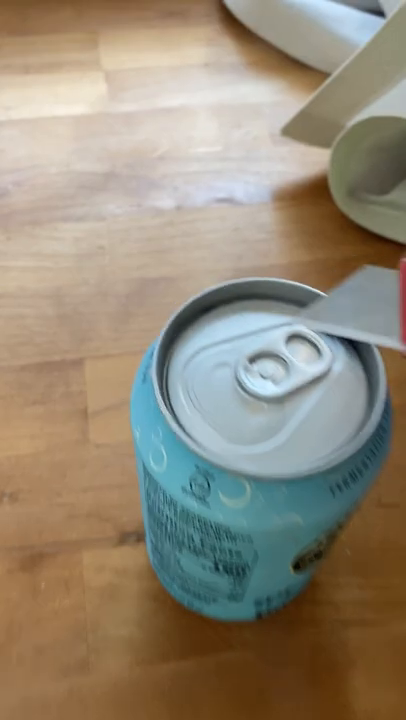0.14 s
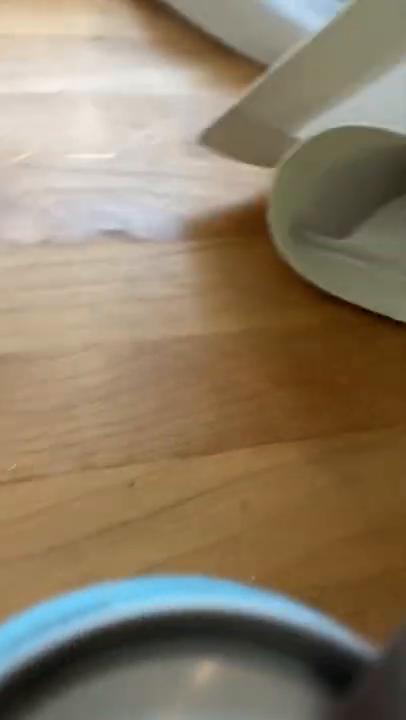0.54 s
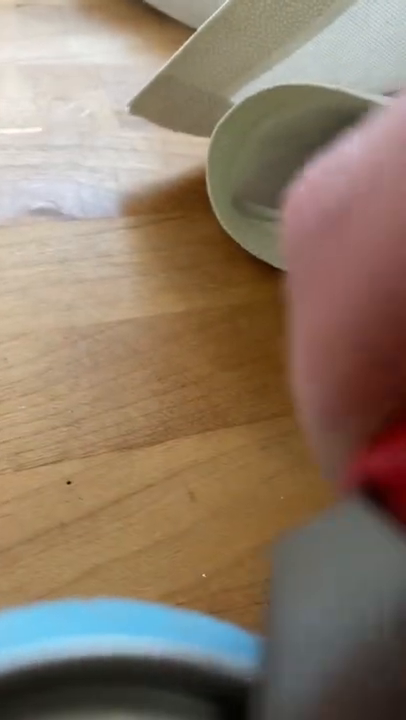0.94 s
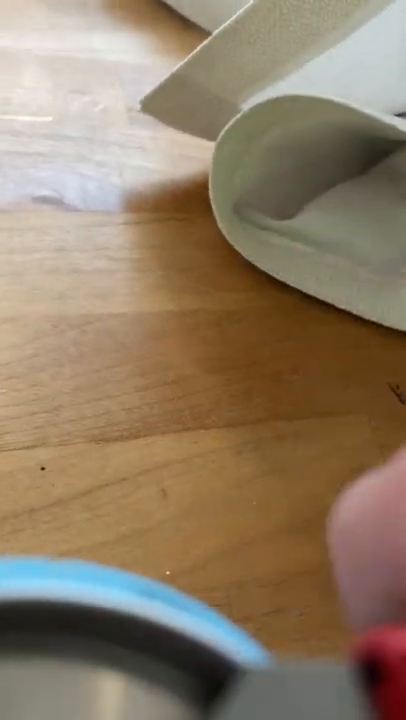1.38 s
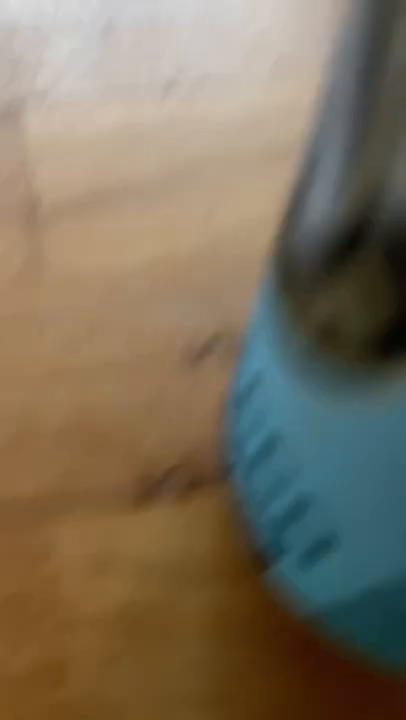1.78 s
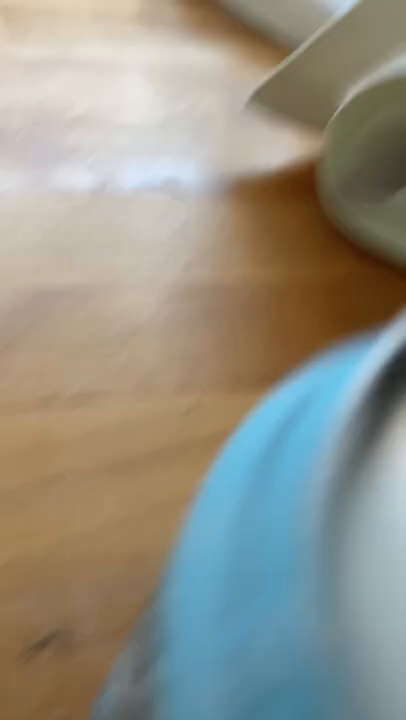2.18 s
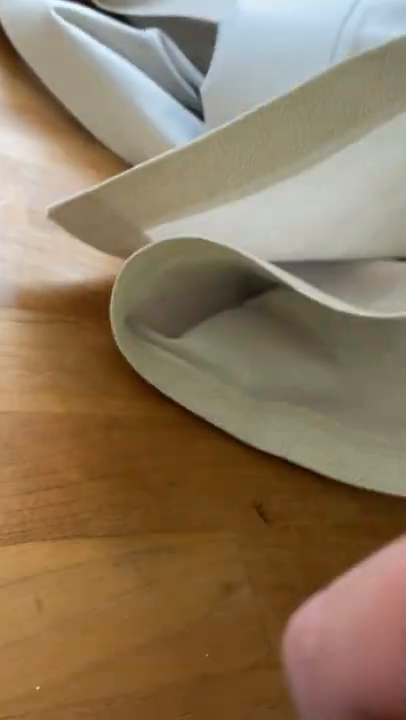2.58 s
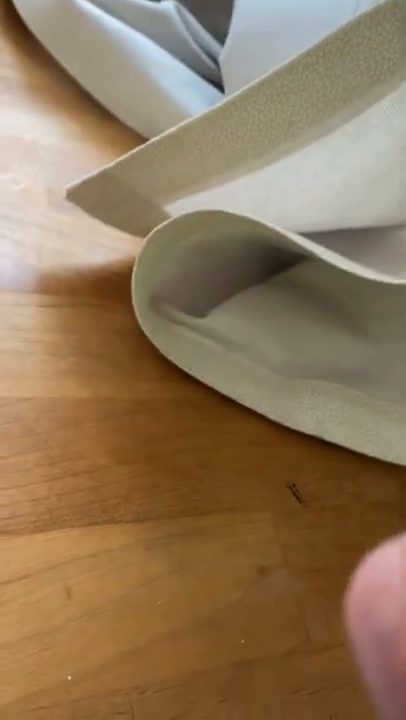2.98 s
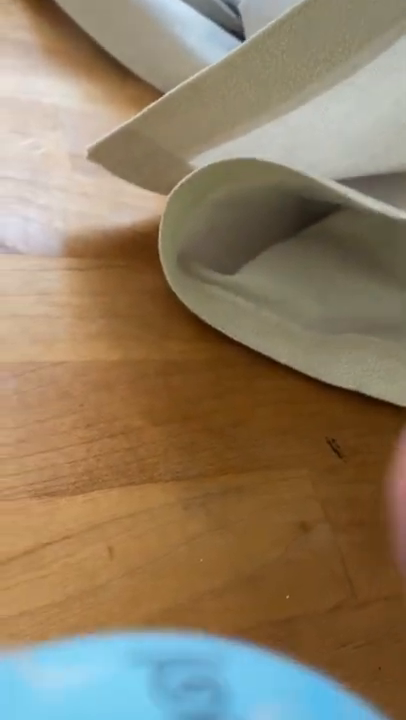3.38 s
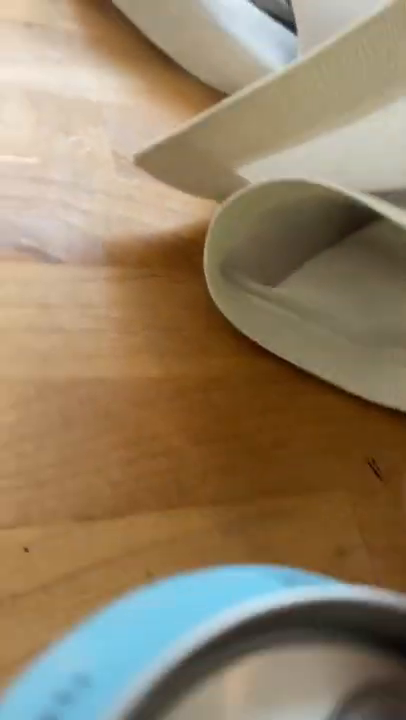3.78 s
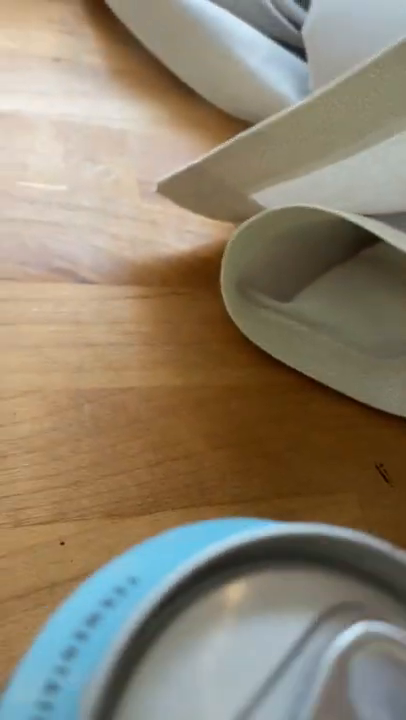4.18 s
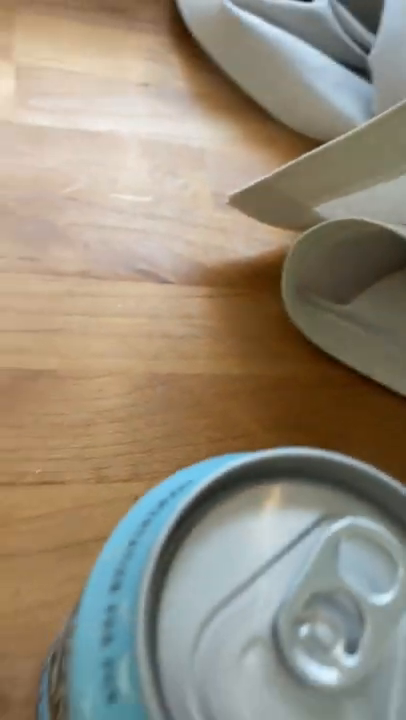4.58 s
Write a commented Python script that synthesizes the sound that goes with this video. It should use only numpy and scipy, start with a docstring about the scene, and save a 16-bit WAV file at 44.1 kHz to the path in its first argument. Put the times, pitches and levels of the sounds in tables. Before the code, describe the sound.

Close phone sound in a small, quiet room with faint room tone and soft hand rumble. Tiny liquid blips come around 0.1-0.2 s, then a loud, bright steel click on the can rim at 0.3. Two ringing lid taps fall at 0.71-0.74, with light scraping and a quick run of ticks to 0.93. A firm scrape swells at 1.05-1.1, and a strong lid click with a soft table bump lands at 1.25. From 1.5 to 2.7 there are only small ticks, faint rubbing and light taps. Thin metal snaps at 2.83 and harder at 3.03, with table thumps and a hiss of about a tenth of a second; another crack follows at 3.1. A rough grinding cut builds from 3.26, squeaks briefly, and ends in a crack and thud at 3.5. A bump comes at 3.78, a dull tab clink at 4.1, then clustered rattling knocks on the phone at 4.5-4.75.

```python
"""In a small room, close to a phone, a knife works at a full aluminium can on a wooden table.
The blade clicks and scrapes on lid and tab: ringing notes for each blow, filtered random slips for each scrape.
The metal gives with snaps (short noise bursts) and a brief hiss of gas (coloured noise), and the blade
grinds through the opening. The can shifts and bumps on the table (short fading notes and rumbling noise),
and last, fingers knock on the phone (fading notes and rattling noise)."""
import sys
import numpy as np
from scipy import signal
from scipy.fft import rfft, irfft, next_fast_len
from scipy.io import wavfile
from scipy.ndimage import map_coordinates

SR = 44100
rng = np.random.default_rng(int(sys.argv[2]) if len(sys.argv) > 2 else 0)


def unload_wav(signal):
    """Save mono or channel-first audio to the path in sys.argv[1] as 16-bit WAV at rate SR, clipped to [-1, 1]."""
    wavfile.write(
        sys.argv[1],
        SR,
        np.round(np.clip(np.atleast_2d(signal).T, -1, 1) * 32767).astype(np.int16),
    )


N = 209122  # length of the scene in samples
T = np.arange(int(SR * 3 / 4)) / SR  # clock of one short sound, in seconds

# In these tables t60 is the time to fall 60 dB, before any ring length factor.
# notes of the lid: f/Hz, level struck near the rim/dB, level struck near the centre/dB, t60/s
LID_MODES = [(1830, -16, -9, 0.07), (1995, -13.5, 3.5, 0.1), (2120, -2.5, -4.5, 0.046), (2296, -1, -8, .04),
             (2435, -3.5, -8.5, 0.066), (3005, -12, -21.5, 0.082), (3320, -21, -10.5, 0.14),
             (4040, -9, -18.5, 0.083), (4110, -9.5, -4, 0.034), (4430, -6.5, -19, 0.011),
             (5480, -2, -18.5, 0.052), (5720, -12.5, 3, 0.06), (6900, -5, -11, 0.0093),
             (6820, 5.5, -23, 0.037), (6850, -7.5, -27.5, 0.0092)]
# faint hum of the whole can after a blow: f/Hz, level/dB, t60/s
SHELL_MODES = [(272.6, -45, 0.98), (412, -48, 0.33), (1280, -55, 0.8), (1530, -48.5, 0.74)]


def amp(db):
    """Turn decibels into a gain."""
    return 10 ** (np.asarray(db) / 20)


def unit(x):
    """Scale to an rms of 1."""
    return x / np.sqrt(np.mean(x ** 2) + 1e-20)


def along(points, hz):
    """Read a curve of (f/Hz, value) points, joined by straight lines on a log frequency axis."""
    f, value = np.transpose(points)
    return np.interp(np.log(hz + 1), np.log(f), value)


def fade(t60):
    """Exponential decay that falls 60 dB in t60 seconds."""
    return amp(-60 * T / max(t60, .001))


def soft_start(rise_s):
    """A blow swells smoothly from zero, with time constant rise_s."""
    return 1 - np.exp(-T / rise_s)


def wobble(rate):
    """A smooth curve through random points, rate of them a second."""
    points = rng.standard_normal(int(N * rate / SR) + 4)
    return map_coordinates(points, [np.arange(N) * rate / SR])


def filtered(x, response):
    """Change each frequency of x by a gain, which may be complex to shift it in time."""
    n = x.shape[-1]
    padded = next_fast_len(n + SR // 4)
    hz = np.fft.rfftfreq(padded, 1 / SR)
    return irfft(rfft(x, padded) * response(hz), padded)[..., :n]


def noise(spectrum, size):
    """Noise of rms 1, coloured by (f/Hz, level/dB) points."""
    return unit(filtered(rng.standard_normal(size), lambda hz: amp(along(spectrum, hz))))


def resonate(x, body):
    """Pass x through side-by-side resonances: (f/Hz, width/Hz, level/dB)."""
    def response(f):
        total = 0
        for k, (centre, width, db) in enumerate(body):
            band = 1j * f * width / (centre * centre - f * f + 1j * f * width)
            total = total + (-1) ** k * amp(db) * band  # neighbours have opposite signs
        return total
    return filtered(x, response)


def add(track, s, sound):
    """Mix a sound into the track from second s."""
    part = track[round(s * SR):][:len(sound)]
    part += sound[:len(part)]


def stroke(start, attack, hold, release, growth_db=0):
    """Gain over time: a rise, a hold that grows by growth_db a second, and a 60 dB fall in release seconds."""
    t = np.arange(N) / SR - start
    rise = np.clip(t / max(attack, .001), 0, 1) ** 2
    growth = growth_db * np.clip(t - attack, 0, hold)
    fall = 60 * np.maximum(t - attack - hold, 0) / max(release, .001)
    return rise * amp(growth - fall)


def cutting(growth_db):
    """The effort of the cut builds slowly and stops short; blade and bracing hand share it."""
    start_s, attack_s, hold_s, release_s = 3.2597, .15, 0.084, 0.067
    return stroke(start_s, attack_s, hold_s, release_s, growth_db)


def air():
    """Room tone: steady coloured noise, separate at each port."""
    # colour of the room tone: f/Hz, level/dB
    air_colour = [(15, -57.5), (25, -35), (92, -10.5), (199, -21.5), (248, -3), (331, -23), (635, -10),
                  (699, -36), (2120, -30.5), (2570, -38), (8000, -34.5), (10400, -76.5), (17600, -120)]
    return amp(-67.5) * np.array([noise(air_colour, N), noise(air_colour, N)])


def handling():
    """The holding hand rumbles, its skin rustles as it shifts and braces, and the cider laps in short notes."""
    # the hand shifts its grip: t/s, hold/s, level/dB
    grip_shifts = [(0.428, 0.063, -55.5), (0.715, .24, -54), (1.145, 0.15, -47), (1.862, 0.13, -53),
                   (3.769, 0.023, -41.5), (4.007, 0.061, -47.5), (4.494, 0.29, -46.5)]
    # colour of the holding hand's rumble: f/Hz, level/dB
    grip_colour = [(25, -17.5), (60, 1.5), (150, 0), (290, -2), (420, -6), (600, -11.5), (800, -14.5),
                   (1400, -24), (3000, -40.5)]
    # colour of skin sliding on the can: f/Hz, level/dB
    skin_colour = [(25, -36), (70, -10), (160, 0), (330, -2), (600, -11.5), (1400, -22), (3000, -38.5)]
    # cider laps inside the can: t/s, level/dB
    cider_laps = [(0.093, -43.5), (0.194, -34.5), (0.205, -31.5), (0.228, -34.5), (1.68, -38.5),
                  (4.318, -42)]
    attack_s, release_s, hold_until_s = 0.012, 0.36, 2.874
    holding = amp(-57) * stroke(-attack_s, attack_s, hold_until_s, release_s)
    shifts = sum(amp(db) * stroke(s, attack_s, hold, release_s) for s, hold, db in grip_shifts)
    bracing = amp(-37) * cutting(growth_db=80)  # ever harder against the cut
    rumble = holding * noise(grip_colour, N) * amp(-2 + 5.1 * wobble(16))
    rustle = (shifts + bracing) * noise(skin_colour, N) * amp(-2.5 + 2.5 * wobble(25))
    out = rumble + rustle
    lap_hz, lap_scatter = 700, .05  # middle pitch, and its share of scatter from lap to lap
    for s, db in cider_laps:
        hz = lap_hz * np.exp(lap_scatter * rng.standard_normal())
        lap = np.sin(2 * np.pi * hz * T) * fade(0.0082) * soft_start(0.0017)
        add(out, s, amp(db + 6) * lap)
    return out


def room(x):
    """Many small reflections make a noise-like tail, different at each port, whose top treble dies fastest."""
    # how long the room echoes: f/Hz, t60/s
    room_decay = [(100, 0.87), (400, 0.3), (1500, 0.55), (5000, 0.16), (14000, 0.073)]
    hz, t, z = signal.stft(rng.standard_normal((2, SR // 2)), SR, nperseg=256)
    decay = amp(-60 * t / along(room_decay, hz)[:, None])
    tail = signal.istft(z * decay, SR, nperseg=256)[1]
    delayed = np.pad(x, (SR // 200, 0))  # the tail starts 5 ms late
    return signal.fftconvolve(delayed[None], tail / np.linalg.norm(tail[0]), axes=1)[:, :N]


def diffuse(x, wet_db, t60):
    """Countless close modes smear and colour a sound: a short noise tail stands in for them."""
    tail = rng.standard_normal(len(T)) * fade(t60) * soft_start(0.0047)
    return x + amp(wet_db) * signal.fftconvolve(x, tail / np.linalg.norm(tail))[:N]


def ring(modes, length):
    """Fading sines of (f/Hz, level/dB, t60/s) modes; length stretches every t60."""
    waver_ms = .06  # the blade keeps moving on the metal, so a ring drifts by about this much in a second
    t = T + waver_ms / 1000 * np.cumsum(rng.standard_normal(len(T))) / np.sqrt(SR)
    out = 0
    for hz, db, t60 in modes:
        phase = rng.random()
        out = out + amp(db) * np.sin(2 * np.pi * (hz * t + phase)) * fade(t60 * length)
    return out


def strike(modes, tilt, length, crack_db, crack_t60):
    """One contact: fading modes, the shell's hum and a noise burst for dense, fast-dying overtones."""
    # colour of the noise burst: f/Hz, level/dB
    crack_colour = [(100, -39.5), (800, -23.5), (1600, 0.5), (2500, -2), (6500, 2.5), (9000, -5),
                    (12000, -8.5), (16000, -16.5)]
    hz, db, t60 = np.transpose(modes)
    db = db + tilt * np.log2(hz / 3000) + rng.normal(0, 1, len(hz))  # tilt in dB per octave
    tone = ring(zip(hz, db, t60), length) / np.linalg.norm(amp(db))
    crack = amp(crack_db + tilt) * noise(crack_colour, len(T)) * fade(crack_t60 * length)
    return (tone + ring(SHELL_MODES, 0.82) + crack) * soft_start(0.00055)


def rubbing():
    """How hard the blade rubs: light strokes, a resting contact, and its flat side along with the cut."""
    # light strokes of the blade on the can: t/s, hold/s, level/dB
    light_rubs = [(0.14, .12, -66.5), (0.48, 0.037, -56), (0.77, 0.23, -46.5), (1.135, .08, -43),
                  (1.57, 0.0057, -62), (1.71, 0.066, -69.5), (1.91, .08, -63.5), (2.14, .025, -62.5),
                  (2.315, 0.017, -63), (2.62, 0.22, -63), (3.655, 0.0085, -50), (4.61, .1, -59)]
    resting = (1.0, 1.442, -66)  # same columns: the edge stays against the can
    attack_s, release_s = 0.022, 0.23
    rows = light_rubs + [resting]
    strokes = sum(amp(db) * stroke(s, attack_s, hold, release_s) for s, hold, db in rows)
    return strokes + amp(-49.5) * cutting(0)


def ticks():
    """Catches of the edge ring the lid briefly; lesser ones come by chance, scaled by the rubbing."""
    # the edge catches and lets go: t/s, level/dB
    edge_ticks = [(0.0954, -49.5), (0.821, -41), (0.87, -38), (0.902, -30), (0.9173, -25.5), (0.9279, -26),
                  (1.6018, -34), (2.0501, -46.5), (2.1512, -35), (3.6967, -34)]
    modes = [(hz, (rim + centre) / 2, t60) for hz, rim, centre, t60 in LID_MODES]

    def tick():
        return strike(modes, tilt=0.39, length=0.13, crack_db=-1.5, crack_t60=0.06)

    out = np.zeros(N)
    for s, db in edge_ticks:
        add(out, s, amp(db + 0.5) * tick())
    catches_per_s, catch_db, scatter_db = 22, 4.5, 3.5  # level is over the rubbing
    moments = rng.random(N) < catches_per_s / SR
    catches = moments * rubbing() * amp(catch_db + scatter_db * rng.standard_normal(N))
    return out + signal.fftconvolve(catches, tick())[:N]


def friction(body, slips):
    """Tiny random slips, slips a second, ring the can; each resonance swells and fades by itself."""
    grains = (rng.random(N) < slips / SR) * rng.standard_normal(N)
    drive = (unit(grains) + amp(-6) * rng.standard_normal(N)) * amp(1.8 * wobble(170))
    bands = 0
    for k, mode in enumerate(body):
        bands = bands + (-1) ** k * resonate(drive, [mode]) * amp(2.5 * wobble(14))
    return unit(diffuse(bands, wet_db=-5, t60=.05))


def scrapes():
    """The edge rubs, pries and finally grinds: slip noise shaped by the strength of each stroke."""
    # resonances under the lightly rubbing blade: f/Hz, width/Hz, level/dB
    rub_body = [(1300, 75, -9), (1522, 65, 4.5), (2285, 110, 4.5), (2750, 550, -3.5), (3656, 360, -6.5),
                (4430, 400, -8.5), (5400, 700, -1), (7140, 3600, -8), (9000, 830, -8.5),
                (13500, 1200, -26.5)]
    # resonances under the prying blade: f/Hz, width/Hz, level/dB
    pry_body = [(1439, 140, -6.5), (1870, 110, 4), (2230, 280, 2.5), (3335, 110, -9), (4240, 200, 0.5),
                (5786, 1400, -4.5), (9100, 3000, -16.5), (13500, 3300, -28.5)]
    # the can's resonances under the cutting edge: f/Hz, width/Hz, level/dB
    cut_body = [(850, 1600, -24), (1524, 35, 4), (2294, 104, 6.5), (2820, 500, -6.5), (3650, 550, -13),
                (4940, 120, -1), (5600, 1000, -6), (6400, 800, -24), (7590, 220, -7), (8190, 160, -2),
                (13500, 4000, -25)]
    light = rubbing() * friction(rub_body, slips=280)
    # one firm stroke at the tab, harder and harder until the point slips
    prying = stroke(start=1.045, attack=0.014, hold=.063, release=.04, growth_db=100)
    pry = amp(-33.5) * prying * friction(pry_body, slips=1000)
    # the cut eases as the metal yields
    cut = amp(-33) * cutting(growth_db=-47) * friction(cut_body, slips=1200)
    return light + pry + cut


def contacts(blows, bouncy):
    """Each blow as a graze, the blow itself and, if it is hard and can bounce, one rebound."""
    graze_s, graze_db = .009, -21.5  # lead before the blow, level against it
    rebound_s, rebound_db = .028, -16  # flight after the blow, level against it
    hard_db = -10  # only blows above this level bounce
    for s, db, *colour in blows:
        yield (s - graze_s, db + graze_db, *colour)
        yield (s, db, *colour)
        if bouncy and db > hard_db:
            yield (s + rebound_s, db + rebound_db, *colour)


def clicks():
    """Steel on aluminium rings rim, lid or tab; the note of the lid's dome joins each lid blow."""
    # the blade glances off the rim: t/s, level/dB, brightness/(dB per octave)
    blade_taps = [(0.2768, -30, -0.5), (0.3053, 3.5, -0.5), (1.5339, -23, 5), (1.9739, -25, -9.5)]
    # the point slips and lands on the lid: t/s, level/dB, brightness/(dB per octave), place (0 rim, 1 centre)
    lid_taps = [(0.714, -5, 0, 0), (0.7359, -3, -1.5, 0), (0.788, -34, -3.5, 0.59), (.888, -26.5, -0.5, .7),
                (1.246, 1, -1, 0.54), (2.5451, -23.5, -3.5, 0.3), (2.658, -36, -3, 0.18),
                (2.836, -19.5, 3.5, 0.016), (3.448, -17, 10, 0.6), (3.509, -11, 3, 1),
                (3.782, -35.5, -7, 0.16), (4.0165, -25.5, -2, 0.42)]
    # the tab flicks: t/s, level/dB, brightness/(dB per octave)
    tab_flicks = [(3.9245, -55, 7.5), (4.102, -7, -3.5)]
    # notes of the blade on the rim: f/Hz, level/dB, t60/s
    blade_modes = [(690, -13, 0.022), (1450, -17, 0.06), (2080, -3, 0.05), (2330, -8, .05), (2716, 2, .05),
                   (2970, -3, .045), (3392, 1, 0.062), (3440, 3, 0.036), (3995, -0.5, 0.065),
                   (4500, -11, 0.06), (4900, -17, 0.12), (5434, -2, 0.07), (5720, -4, 0.075),
                   (6300, -2, 0.04), (7950, -1, 0.045)]
    # notes of the tab: f/Hz, level/dB, t60/s
    tab_modes = [(1297, -6.5, 0.081), (1343, -5.5, 0.054), (1520, -19, 0.18), (1630, -10, 0.038),
                 (1957, 3, 0.022), (2065, -2, 0.063), (2756, -3.5, 0.029), (4060, -9, 0.06),
                 (5130, -7, .02), (5590, -15, .035), (6680, -19, 0.023)]
    blade_ring, lid_ring, tab_ring = .92, 0.82, 0.88  # ring length factors
    out = np.zeros(N)
    for s, db, tilt in contacts(blade_taps, bouncy=False):
        click = strike(blade_modes, tilt, blade_ring, crack_db=-4.0, crack_t60=0.027)
        add(out, s, amp(db - 8.5) * click)

    dome_hz, dome_t60_s = 1509, .09
    dome = np.sin(2 * np.pi * dome_hz * T) * fade(dome_t60_s) * soft_start(0.0013)
    for s, db, tilt, place in contacts(lid_taps, bouncy=True):
        modes = [(hz, rim + place * (centre - rim), t60) for hz, rim, centre, t60 in LID_MODES]
        length = lid_ring * np.exp(-1.3 * place)  # the point chokes the ring more near the centre
        dome_db = -13.5 - 2.5 * tilt - 10.5 * place  # dull blows bring the dome out, the centre mutes it
        click = amp(-1.0) * strike(modes, tilt, length, crack_db=0.5, crack_t60=0.024)
        add(out, s, amp(db) * (click + amp(dome_db) * dome))

    for s, db, tilt in contacts(tab_flicks, bouncy=True):
        flick = strike(tab_modes, tilt, tab_ring, crack_db=2.0, crack_t60=0.012)
        add(out, s, amp(db + 1.5) * flick)
    return out


def table():
    """Bending waves in the wood bring high notes first, as falling sweeps; bumps are short thuds without a sweep."""
    # jolts that bend the table top: t/s, level/dB, height of the sweep's start above its end/Hz, boom level/dB
    table_jolts = [(2.8327, -20, 663, -31.5), (3.035, -17, 773, -40), (3.077, -36, 386, -50),
                   (3.107, -29.5, 300, -47.5), (3.158, -48.5, 402, -49)]
    # the can and the hand bump on the table: t/s, level/dB, centre f/Hz, t60/s
    table_bumps = [(.72, -27, 339.4, 0.12), (0.727, -32, 161, 0.089), (0.914, -41.5, 110, 0.17),
                   (1.122, -35.5, 151, 0.08), (1.175, -41.5, 477.6, 0.22), (1.25, -32, 150, 0.1),
                   (1.28, -30, 331, 0.13), (1.285, -28, 150, 0.063), (1.536, -42.5, 693, 0.052),
                   (1.712, -41, 247, 0.19), (2.217, -38.5, 302, 0.14), (2.439, -41.5, 70, 0.13),
                   (2.545, -21, 960, 0.018), (2.55, -38, 372, 0.1), (2.66, -33, 370, 0.032),
                   (3.397, -31.5, 170, 0.077), (3.448, -30, 755, 0.024), (3.498, -18.5, 956, 0.02),
                   (3.508, -21.5, 404, 0.026), (3.785, -23.5, 230.4, 0.064), (4.06, -30.5, 212, 0.045)]
    out = np.zeros(N)
    for s, db, drop_hz, boom_db in table_jolts:
        sweep_hz = 47 + drop_hz * np.exp(-T / .003)
        sweep = np.sin(2 * np.pi * np.cumsum(sweep_hz) / SR)
        decay = fade(0.056) + amp(boom_db) * fade(0.99)  # a quick thump and a lingering boom
        add(out, s, amp(db + 5.0) * sweep * decay * soft_start(0.0028))
    for s, db, hz, t60 in table_bumps:
        modes = [(hz * .66, -6, t60), (hz * .94, 0, t60), (hz * 1.25, -4, t60), (hz * 1.75, -7, t60 * .7)]
        add(out, s, amp(db + 2.5) * ring(modes, length=1) * soft_start(0.0025))
    return out


def squeals():
    """Sticking and slipping locks on to one mode: brief, unsteady notes that swell and fade."""
    # the edge sings or judders: t/s of the middle, level/dB, half length/s, f/Hz
    squeal_notes = [(1.067, -45, 0.015, 4700), (1.2, -45, 0.035, 3270), (1.964, -63.5, 0.046, 2770),
                    (3.359, -46, 0.017, 2262), (1.827, -67, 0.048, 2720), (3.41, -34.5, 0.024, 2295),
                    (3.443, -35.5, 0.034, 5670), (3.487, -23.5, 0.0098, 160)]
    t = np.arange(N) / SR
    out = np.zeros(N)
    for s, db, half, hz in squeal_notes:
        swell = np.exp(-((t - s) / half) ** 2)
        note = np.sin(2 * np.pi * hz * (t + 8e-5 * wobble(140)))
        out += amp(db) * swell * note * amp(5.5 + 1.5 * wobble(90))
    return out


def snaps():
    """Thin metal buckles in dry double cracks: resonant noise bursts, each with some shell hum."""
    # t/s of the second crack, level/dB, centre f/Hz, top treble level/dB, shell hum level/dB,
    # level of the first crack against the second/dB
    metal_snaps = [(2.8312, -14, 4014, -10, -13.5, 0.5), (3.0345, -9, 4040, -9, -11, -7.5),
                   (3.0989, -10, 3990, -34, -17.5, -24), (3.508, -8.5, 5220, -25, -1, 1.5),
                   (4.6907, -27.5, 3494, -21, -15, -33)]
    gap_s = .0076  # between the two cracks
    out = np.zeros(N)
    for s, db, hz, sharp_db, hum_db, first_db in metal_snaps:
        body = [(2350, 500, -8), (hz, 900, 0), (6200, 1800, -3), (12500, 6000, sharp_db)]
        for lead, crack_db in ((gap_s, db + first_db), (0, db)):
            burst = unit(resonate(rng.standard_normal(len(T)), body))
            hum = amp(hum_db) * ring(SHELL_MODES, 1.0)
            add(out, s - lead, amp(crack_db) * (burst * fade(0.017) + hum) * soft_start(0.000465))
    return out


def gas():
    """Pressure escapes through a narrow slit in one short puff of fluttering, coloured noise."""
    # colour of the escaping gas: f/Hz, level/dB
    jet_colour = [(200, -19.5), (1100, -19.5), (2500, -19.5), (4500, -12.5), (6300, -5), (8000, 8),
                  (10000, -4.5), (12000, -1.5), (14800, 2.5), (16500, -16.5)]
    puff = amp(-24) * stroke(start=3.033, attack=0.0029, hold=0.079, release=0.068)
    flutter = amp(1.2 * wobble(140))
    return puff * flutter * noise(jet_colour, N)


def knocks():
    """Knocks travel through the phone's body and shake each port in its own way: notes plus rattle."""
    # fingers knock on the phone's case: t/s, level/dB
    case_knocks = [(4.511, -19), (4.533, -22), (4.546, -26), (4.639, -20.5), (4.649, -20), (4.691, -15),
                   (4.709, -20), (4.722, -23.5), (4.732, -23)]
    # notes of the case: f/Hz, level/dB, t60/s
    case_modes = [(278, -5.5, 0.3), (320, -10.5, 0.22), (444.6, -2.5, 0.11), (561.4, -2.5, 0.13),
                  (786, -33, .04), (935, -8, 0.036), (974, 2, 0.044), (1206, -4, 0.074), (1560, -2, 0.035),
                  (1813, -6.5, 0.028)]
    # colour of the loose case's rattle: f/Hz, level/dB
    rattle_colour = [(40, -44), (110, 3), (280, -0.5), (900, 8), (1700, -8.5), (3200, -13), (6000, -32.5),
                     (10000, -58), (16000, -68)]
    out = np.zeros((2, N))
    for s, db in case_knocks:
        shared_rattle = amp(-2.0) * noise(rattle_colour, len(T)) * fade(0.096)
        shared = ring(case_modes, 0.96) + shared_rattle
        for port, side_db in zip(out, (1.1, -1.1)):
            own_rattle = amp(-0.5) * noise(rattle_colour, len(T)) * fade(0.11)
            own = amp(-12) * ring(case_modes, 1) + own_rattle
            add(port, s, amp(db + side_db - 11.5) * (shared + own) * soft_start(0.0012))
    return out


def scene():
    """The can's sound reaches the left port a moment before the right, smeared differently at each."""
    metal = clicks() + ticks()
    thuds = table() + handling()
    direct = snaps() + scrapes() + squeals() + gas()

    def one_port():
        # thuds spread through the table and reach each port by their own paths
        smeared_metal = diffuse(metal, wet_db=-16, t60=0.046)
        return direct + smeared_metal + diffuse(thuds, wet_db=-19, t60=.08)

    both = np.array([one_port(), one_port()])
    port_lag_s = 52e-6
    sides = np.array([[1], [-1]])  # left early by half the lag, right late by half
    ports = filtered(both, lambda hz: np.exp(1j * np.pi * hz * port_lag_s * sides))
    balanced = ports * amp([[-.2], [.2]])
    echo = amp(-32.5) * room(metal + thuds + direct)
    return balanced + knocks() + echo + air()


def record(dry):
    """The phone rounds off the highest peaks and keeps almost nothing above its band limit."""
    top_hz = 16200
    held = dry / (1 + np.abs(dry) ** 6) ** (1 / 6)
    return filtered(held, lambda hz: 1 / (1 + (hz / top_hz) ** 120))


dry = scene()
out = record(dry)
unload_wav(out)
```